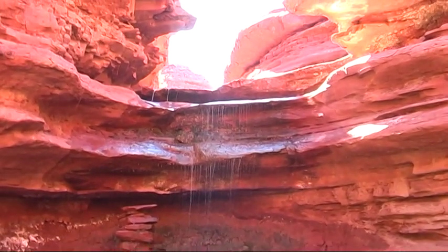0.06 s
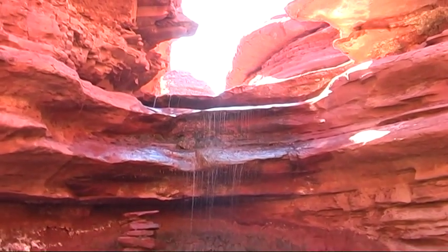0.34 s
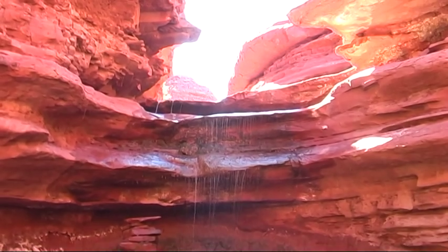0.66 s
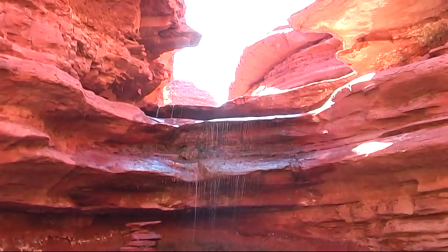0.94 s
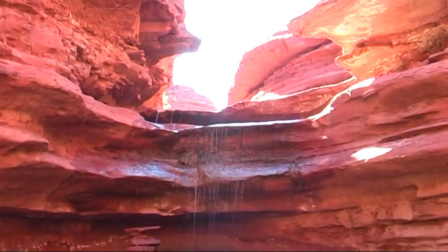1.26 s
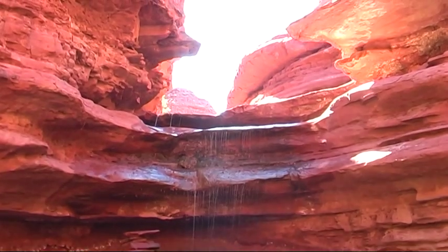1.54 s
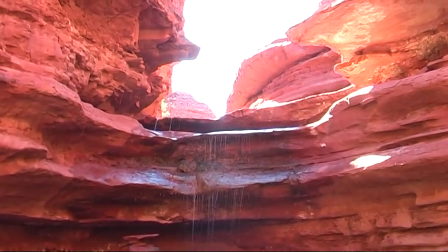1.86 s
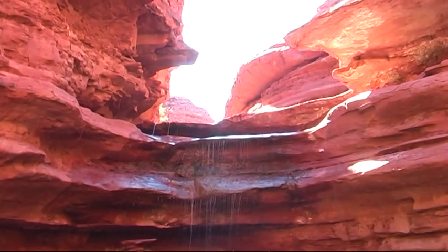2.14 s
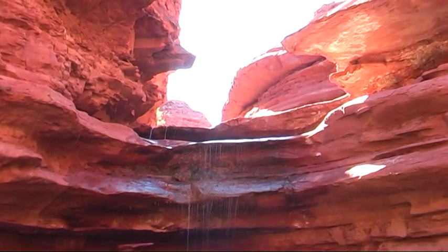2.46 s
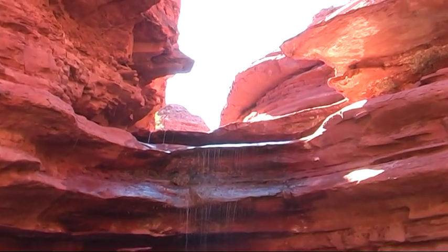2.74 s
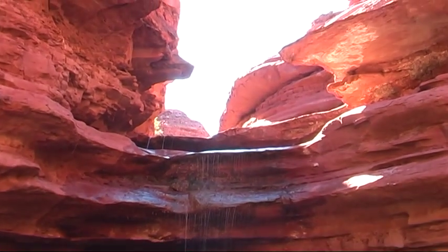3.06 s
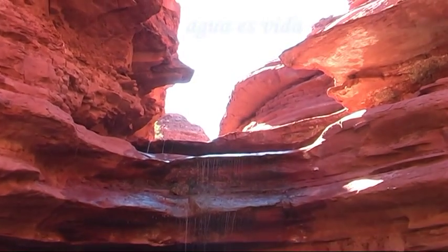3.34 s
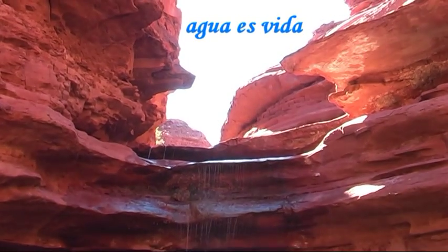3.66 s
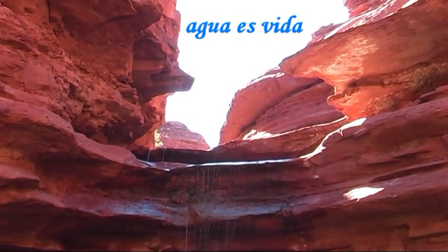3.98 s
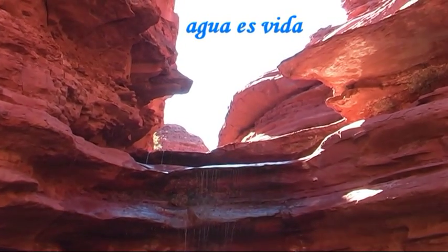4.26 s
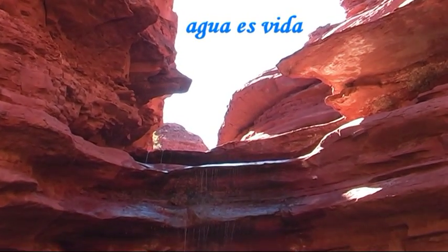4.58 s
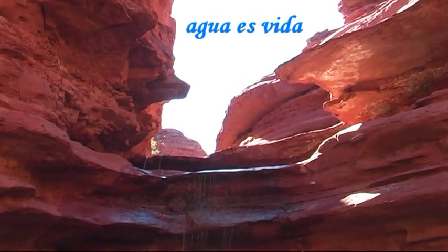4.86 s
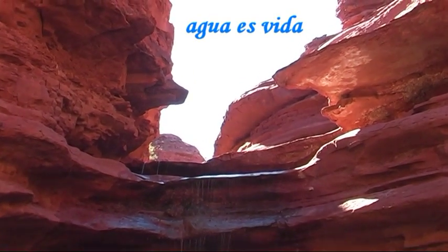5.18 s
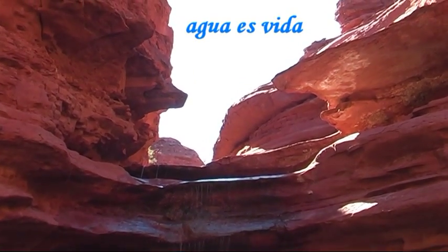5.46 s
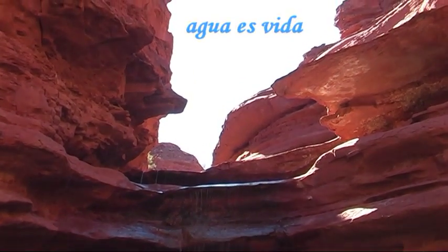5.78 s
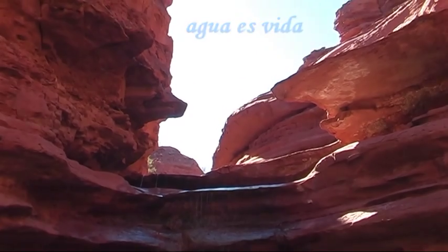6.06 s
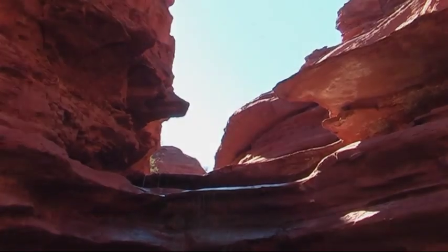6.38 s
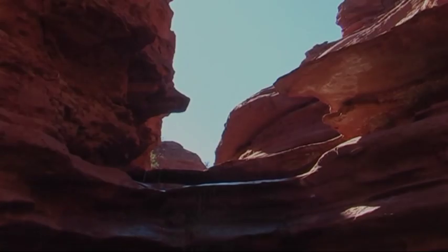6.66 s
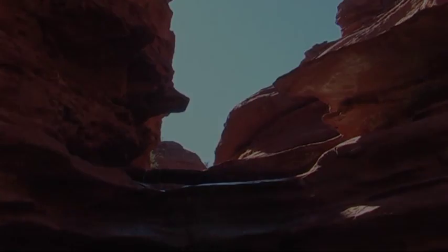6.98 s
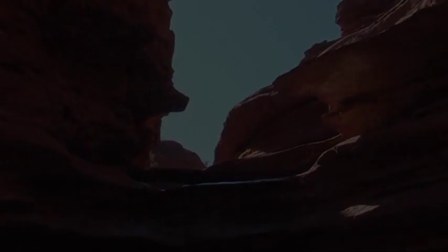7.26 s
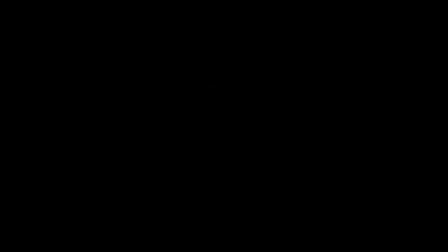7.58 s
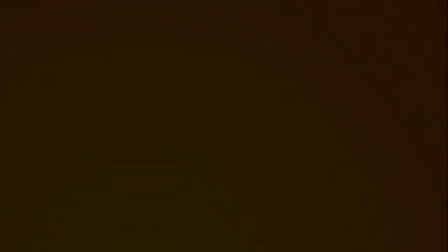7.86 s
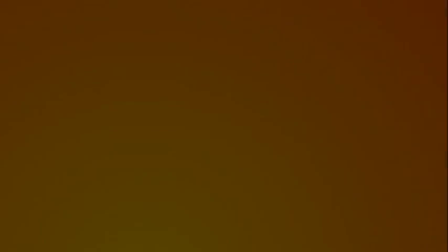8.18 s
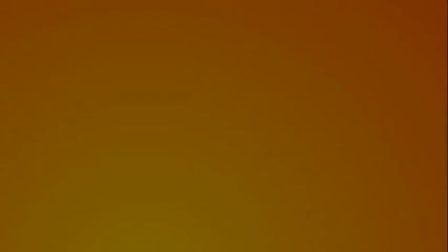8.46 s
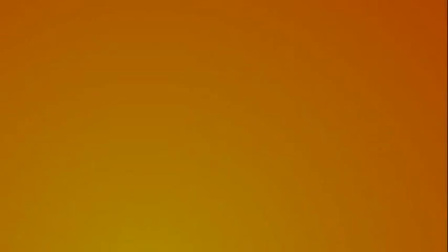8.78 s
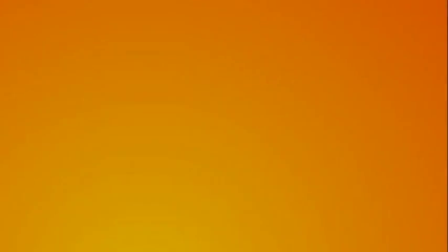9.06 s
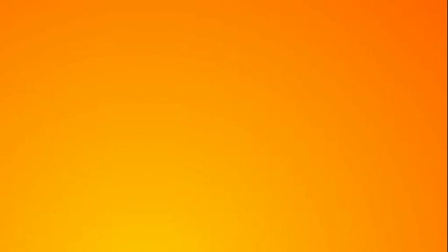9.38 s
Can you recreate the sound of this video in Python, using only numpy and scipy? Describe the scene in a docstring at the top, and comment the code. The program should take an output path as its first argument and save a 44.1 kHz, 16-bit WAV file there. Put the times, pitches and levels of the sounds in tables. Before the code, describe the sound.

Thin streams of water trickle from a rock overhang into a shallow pool, with a splashing hiss, drips and a few close knocking drops.

```python
"""A splashing hiss fades in: thin streams of water fall from a rock overhang into a shallow pool.
Drops plop in the pool and spatter on wet rock, trapped air bubbles plink, and fine spray ticks close by.
A few big drops knock on something hard near the microphone and make it ring. Air rushes softly below.
The sound is cut off after about 7.5 seconds and starts over from its beginning."""
import sys
import numpy as np
from scipy import signal
from scipy.fft import rfft, irfft, next_fast_len
from scipy.io import wavfile
from scipy.ndimage import uniform_filter1d

SR = 44100
rng = np.random.default_rng(int(sys.argv[2]) if len(sys.argv) > 2 else 0)


def generate_wav(sig):
    """Save sig (samples, or channels by samples) to the path in sys.argv[1] as 16-bit PCM at SR."""
    pcm = np.round(np.clip(np.atleast_2d(sig).T, -1, 1) * 32767).astype(np.int16)
    wavfile.write(sys.argv[1], SR, pcm)


N = 415422
CUT_S, RESTART_S = 7.546, 7.6

# the larger drops that hit the pool and the wet rock: t/s, level/dB, f/Hz, rough fading time/s
LARGE_DROPS = [(.684, -38.5, 4870, 0.0053), (2.133, -33.5, 7360, .035), (2.38, -34, 3100, 0.015),
               (2.67, -22, 5650, 0.023), (2.787, -35.5, 7350, 0.0067), (3.028, -36.5, 525, .014),
               (3.429, -35, 1190, 0.04), (3.731, -32.5, 5800, 0.026), (3.794, -32, 5000, .03),
               (3.866, -31, 6750, 0.022), (4.13, -37.5, 7300, 0.019), (4.322, -33, 3300, 0.024),
               (4.622, -26, 5200, .029), (4.791, -29.5, 6400, 0.022), (5.556, -36, 4700, .008),
               (5.61, -35.5, 5100, 0.017), (5.705, -35, 1420, 0.012), (6.078, -41, 5200, .008),
               (6.162, -34, 5140, .019), (6.722, -30.5, 6460, .019), (6.854, -33, 6900, .018),
               (6.929, -32, 4660, 0.023), (6.948, -36, 3350, 0.0069), (7.017, -36, 1550, 0.022),
               (7.304, -32, 6500, .025), (7.395, -36.5, 5160, 0.0065)]
def splashes():
    """Each of the larger drops makes a splash of its own."""
    out = np.zeros((2, N))
    for s, db, hz, decay_s in LARGE_DROPS:
        add(out, s, gain_of(db) * splash(hz, 0.93 * decay_s))
    return out


# hollows in the wet rock, each with a note of its own: f/Hz, width/Hz, level/dB
ROCK_HOLLOWS = [(4570, 220, 1), (6340, 440, -9)]
def splash(hz, decay_s, middle_hz=3100):
    """A drop bursts and rings the hollows. Low ones plop in the pool, high ones hit rock on the left."""
    width_hz = 800 * (hz / middle_hz) ** 0.68
    pan_db = 2.5 * max(np.log2(hz / middle_hz), 0)
    side_db = min(read(STEREO_WIDTH, hz) + 2, 0)
    crown = burst(hz, width_hz, decay_s, side_db, pan_db)
    spatter = gain_of(-4.5) * burst(hz, .65 * hz, decay_s, side_db, pan_db)
    t = np.arange(crown.shape[1]) / SR
    opening = 1 - np.exp(-t / (0.085 * decay_s))  # the crown of water takes a moment to open
    hit = (crown + spatter) * opening
    ringing = sum(gain_of(db) * band(hit, f, width, order=1) for f, width, db in ROCK_HOLLOWS)
    return unit_hit(hit + ringing)


def drips(level_db=-41.5, low_hz=750, high_hz=7500, count=56):
    """Medium drops fall at uneven times, more of them on the rock than in the pool."""
    out = np.zeros((2, N))
    for slot, (when, pitch, loud, length) in enumerate(rng.random((count, 4))):
        hz = low_hz * (high_hz / low_hz) ** (pitch ** 0.43)  # mostly high notes
        db = level_db + 2 * drop_size(loud, limit=2)
        add(out, (slot + when) * CUT_S / count, gain_of(db) * splash(hz, decay_s=.012 * (.5 + length)))
    return out


# how strong the small splashes are at each pitch: f/Hz, relative level/dB
PATTER_TONE = [(500, -3.5), (1000, -10.5), (1600, -1.5), (2500, -1), (4500, -11.5), (6500, 3.5), (9000, 5)]
def patter(level_db=-53):
    """Countless small splashes, low and high, land all over the pool."""
    out = np.zeros((2, N))
    for hz in np.geomspace(800, 8500, num=40):
        decay_s = 0.017 * rng.uniform(0.56, 1.6)
        drop = burst(hz, 0.13 * hz, decay_s, read(STEREO_WIDTH, hz), pan_db=rng.normal(.7, 2))
        out += shower(gain_of(read(PATTER_TONE, hz)) * drop, per_s=4.5, spread_db=3)
    return gain_of(level_db) * unit_rms(out)


# the clearest bubbles: t/s, level/dB, f/Hz
CLEAR_BUBBLES = [(.642, -42.5, 4900), (1.061, -38.5, 2600), (1.086, -43, 3900), (1.475, -43.5, 2850),
                 (1.525, -45, 4900), (3.184, -41.5, 2250), (3.731, -37, 5580), (4.9, -40.5, 2410),
                 (6.078, -35.5, 4670), (6.787, -44, 1800), (6.989, -39, 1696)]
def bubbles(small_db=-54, count=130):
    """A few clear plinks stand out among many faint bubbles."""
    out = np.zeros((2, N))
    for s, db, hz in CLEAR_BUBBLES:
        add(out, s, gain_of(db) * bubble(hz))
    for when, pitch, loud, place in rng.random((count, 4)):
        db = small_db + 3 * drop_size(loud)
        add(out, when * CUT_S, gain_of(db) * bubble(hz=1700 * 4.3 ** pitch, pan_db=10 * (place - .5)))
    return out


def bubble(hz, pan_db=0, cycles=26, rise=0.012):
    """Air trapped in the water rings briefly, and its note rises a little."""
    t = np.arange(SR // 12) / SR
    age = t * hz / cycles
    tone = np.sin(2 * np.pi * cycles * age * (1 + rise * (age - 1) / 2))
    loudness = np.exp(-age) * (1 - np.exp(-10 * age))
    return stereo(unit_hit(tone * loudness), 0, pan_db)


# big drops on the hard surface: t/s, level/dB, brightness/(dB per octave), top f/Hz that the blow wakes
KNOCKING_DROPS = [(.496, -22, -1.5, 4160), (.79, -29.5, 1.5, 7200), (1.03, -31.5, 9, 7000),
                  (1.354, -42, -6, 2200), (2.245, -32, 4, 5600), (2.597, -39, 5, 6000),
                  (2.739, -38, 0, 5500), (2.761, -32.5, -3, 3000), (2.866, -37.5, 0, 4800),
                  (3.856, -29, 5.5, 3260), (4.158, -32.5, 8, 6000), (4.215, -36.5, 19, 5600),
                  (5.053, -19, 7.5, 4180)]
# the notes that the surface rings with: f/Hz, relative level/dB, time to fade by 60 dB/s
SURFACE_NOTES = [(1395, -15, 0.045), (1580, 4, 0.013), (2110, -27, 0.0083), (2657, -6.5, .026),
                 (2855, -8.5, 0.039), (3210, -6, 0.041), (3397, 2.5, 0.026), (3640, -14.5, .028),
                 (3903, 0, 0.035), (4200, -18, 0.023), (4280, 3, 0.022), (4870, -3.5, 0.024),
                 (5210, -4.5, 0.029), (5790, -17.5, 0.017), (6260, -11.5, 0.058), (7200, -17.5, 0.022)]
def knocks(flatten_s=.0016, echo_s=.019, echo_db=-17):
    """A big drop rings the surface and bursts. Sharper blows wake higher notes; nearby rock echoes."""
    out = np.zeros((2, N))
    t = np.arange(SR // 8) / SR
    hz, note_db, t60 = np.transpose(SURFACE_NOTES)[:, :, None]
    fading = gain_of(note_db - 60 * t / t60)
    push = 1 - np.exp(-(t / flatten_s) ** 2)  # the blow builds up while the drop flattens
    for s, db, brightness, top_hz in KNOCKING_DROPS:
        blow = gain_of(brightness * np.log2(hz / hz.mean()))
        treble_cut = np.sqrt(1 + (hz / top_hz) ** 24)
        swing = np.sin(2 * np.pi * (hz * t + rng.random(hz.shape)))
        notes = blow / treble_cut * fading * swing
        ring = stereo(unit_hit(notes.sum(0) * push), 0)
        scatter = gain_of(-9) * burst(0.76 * top_hz, 0.25 * top_hz, decay_s=0.02, side_db=-22.5)
        plop = gain_of(-16) * burst(1440, 600, decay_s=0.0093, side_db=-18)
        add(out, s, gain_of(db) * (ring + scatter + plop))
        add(out, s + echo_s, gain_of(db + echo_db) * ring)
    return out


# the loudest droplets of spray: t/s, relative level/dB, f/Hz
SPRAY_DROPLETS = [(0.7173, -24, 14900), (0.9288, -25.5, 15000), (1.1503, -29.5, 11400),
                  (1.1837, -23, 15000), (1.2067, -25, 10800), (1.3109, -29.5, 12200),
                  (1.4775, -28.5, 11000), (1.5858, -22.5, 11100), (1.696, -27, 14900),
                  (1.7245, -25.5, 14600), (2.166, -28, 12400), (2.2218, -24.5, 13500),
                  (3.8018, -29.5, 11400), (3.9629, -30, 14400), (4.2732, -26, 15000),
                  (4.4024, -20.5, 15300), (5.8561, -28, 9500), (6.111, -26, 15000), (6.6677, -26.5, 10900),
                  (7.229, -27, 14900)]
# how strong the spray is at each pitch: f/Hz, relative level/dB
SPRAY_TONE = [(3000, -14.5), (8000, 1), (10000, -2), (11300, 0.5), (12000, -3.5), (13500, -2), (15000, -3),
              (15800, -1.5)]
# high notes that the spray sets ringing: f/Hz, width/Hz, relative level/dB
SPRAY_NOTES = [(11000, 160, -5.5), (11500, 160, -10.5), (13610, 150, -2), (14930, 260, 4)]
def spray(width_hz=4000, side_db=-15):
    """Droplets tick close by, above a mist of finer ones."""
    droplets = np.zeros((2, N))
    for s, db, hz in SPRAY_DROPLETS:
        add(droplets, s, gain_of(db - 11) * burst(hz, width_hz, 0.0094, side_db))
    mist = sum(shower(burst(hz, width_hz, 0.0038, side_db), per_s=3, spread_db=5)
               for hz in np.linspace(10500, 15500, num=16))
    ticks = coloured(droplets + gain_of(-53) * unit_rms(mist), SPRAY_TONE)
    return ticks + sum(gain_of(db) * band(ticks, hz, width, order=1) for hz, width, db in SPRAY_NOTES)


def alcove(sound, ground_s=.00302, t60=0.14, walls_db=-15):
    """The ground sends back one quick echo, and the rock walls add a short, faint blur of echoes."""
    t = np.arange(SR // 3) / SR
    tail = rng.standard_normal((2, len(t))) * gain_of(-60 * t / t60) * (t > .008)
    walls = signal.oaconvolve(sound, tail / np.linalg.norm(tail[0]), axes=1)[:, :N]
    ground = 0.14 * np.roll(sound, round(ground_s * SR), axis=1)
    return sound + ground + gain_of(walls_db) * walls


# the hiss of the falling water: f/Hz, level/(dB per Hz)
HISS_TONE = [(20, -110), (300, -90), (800, -85.5), (1150, -80), (1700, -77.5), (2300, -79), (3000, -81),
             (3800, -83), (5100, -82.5), (6500, -85), (8000, -88.5), (9500, -89), (13000, -87),
             (15800, -94)]
# narrow bands that stand out of the hiss: f/Hz, width/Hz, level/dB
HISS_PEAKS = [(12150, 450, -59.5), (14950, 160, -68), (1786, 6, -62.5)]
def hiss():
    """Faraway splashes blend into a hiss."""
    return wash(HISS_TONE, patchy_db=1.44, flicker_db=0.84) + steady_bands(HISS_PEAKS, side_db=-22)


# the low rush of air in the canyon: f/Hz, relative level/(dB per Hz)
AIR_TONE = [(15, -83), (38, -81), (55, -72), (80, -77.5), (130, -75), (330, -76.5), (470, -79.5),
            (750, -79.5), (1100, -86), (2000, -100), (8000, -130)]
# a barely audible 25 Hz band of steady noise, under two low hums: f/Hz, width/Hz, relative level/dB
LOW_BANDS = [(25, 3.8, -57), (61, 9, -67.5), (102.5, 5.8, -59.5)]
def air_and_hum(entry_s=0.99, peak_s=5.6, swell_s=2.2):
    """A low rush of air and a faint hum come in later than the water and slowly swell once."""
    t = np.arange(N) / SR
    entry_db = -11 * np.maximum(1 - (t / entry_s) ** 2, 0)
    swell_db = 3 * np.exp(-((t - peak_s) / swell_s) ** 2)
    rush = wash(AIR_TONE, patchy_db=1.2, flicker_db=0.77)
    low_bands = steady_bands(LOW_BANDS, side_db=1.5)
    return gain_of(entry_db + swell_db - 2) * (rush + low_bands)


# how wide the noise and the splashes sound at each pitch: f/Hz, level of side against middle/dB
STEREO_WIDTH = [(100, -1), (500, -0.5), (900, -1.5), (1700, -6), (2700, -6.5), (3800, -2.5), (5100, -3.5),
                (6500, -2), (8000, -6.5), (10000, -9), (12500, -13.5), (15500, -6.5)]
def wash(tone, patchy_db, flicker_db, echo_s=.0043):
    """Steady noise flickers in patches of time and pitch; a quick echo ripples its sides."""
    frames, bins = N // 128 + 5, 257
    real, imag = rng.standard_normal((2, 2, frames, bins))
    patches = uniform_filter1d(rng.standard_normal((frames, bins)), size=8, axis=0)
    patches = unit_rms(uniform_filter1d(patches, size=9, axis=1))
    flicker = unit_rms(uniform_filter1d(rng.standard_normal(frames), size=10))[:, None]
    spectra = (real + 1j * imag) * gain_of(patchy_db * patches + flicker_db * flicker)
    _, noise = signal.istft(spectra.transpose(0, 2, 1), nperseg=512, noverlap=384)
    white = unit_rms(noise[:, :N]) * np.sqrt(SR / 2)  # 0 dB per Hz
    mid, side = coloured(white, tone)
    echo = .2 * np.roll(side, round(echo_s * SR))
    return stereo(mid, coloured(side + echo, STEREO_WIDTH))


def steady_bands(rows, side_db):
    """Narrow bands of steady noise, each close to a note."""
    mid, side = sum(gain_of(db) * unit_rms(band(rng.standard_normal((2, N)), hz, width))
                    for hz, width, db in rows)
    return stereo(mid, gain_of(side_db) * side)


def burst(hz, rough_width_hz, decay_s, side_db, pan_db=0):
    """A drop breaks up into tiny clicks around one pitch, which quickly die away."""
    t = np.arange(SR // 8) / SR
    clicks = rng.standard_normal((2, len(t))) * np.exp(0.32 * rng.standard_normal(len(t)))
    mid, side = map(unit_rms, band(clicks * np.exp(-t / decay_s), hz, 1.18 * rough_width_hz))
    return unit_hit(stereo(mid, side * gain_of(side_db), pan_db))


def shower(sound, per_s, spread_db):
    """Repeats the sound of a drop at random times and strengths."""
    out = np.zeros((2, N))
    for when, loud in rng.random((int(per_s * CUT_S) + 1, 2)):
        add(out, when * CUT_S, sound * gain_of(spread_db * drop_size(loud)))
    return out


def drop_size(chance, limit=3):
    """Turns a random number from 0 to 1 into a size: most drops are small, a few are large."""
    return min(-np.log(1 - chance), limit)


def gain_of(db):
    """Turns decibels into a number to multiply a sound by."""
    return 10 ** (np.asarray(db) / 20)


def unit_rms(x):
    """Sets the average strength (rms) of a sound to 1."""
    return x / np.sqrt(np.mean(x ** 2) + 1e-20)


def unit_hit(x):
    """Gives a short sound the energy of 10 ms at strength 1."""
    return unit_rms(x) * np.sqrt(.01 * SR / x.shape[-1])


def read(points, hz):
    """Looks up the level at a pitch, gliding between the rows of a table."""
    f, db = np.transpose(points)
    return np.interp(np.log(hz + 1), np.log(f + 1), db)


def add(mix, s, sound):
    """Lays a stereo sound into the mix, s seconds in."""
    part = mix[:, round(s * SR):][:, :sound.shape[1]]
    part += sound[:, :part.shape[1]]


def band(x, hz, width, order=2):
    """Keeps only the pitches around hz."""
    edges = np.clip([hz - width / 2, hz + width / 2], hz / 4, .48 * SR)
    return signal.sosfilt(signal.butter(order, edges, "bandpass", fs=SR, output="sos"), x)


def coloured(x, points):
    """Turns each pitch up or down as a table says."""
    size = next_fast_len(x.shape[-1] + 512)
    gains = gain_of(read(points, np.fft.rfftfreq(size, 1 / SR)))
    return irfft(rfft(x, size) * gains, size)[..., :x.shape[-1]]


def stereo(mid, side, pan_db=0):
    """Makes left and right from what they share (mid) and what sets them apart (side)."""
    return np.array([(mid + side) * gain_of(pan_db / 2), (mid - side) * gain_of(-pan_db / 2)])


def scene():
    """The pool echoing under the overhang, the drops close by, and the background."""
    pool = splashes() + drips() + patter() + bubbles()
    return alcove(pool) + knocks() + spray() + hiss() + air_and_hum()


def record(dry, fade_start_s=0.25, fade_s=1.106, noise_db=-95, top_hz=15850):
    """Fades in, cuts off and starts over, above faint electronic noise; the top treble is removed."""
    t = np.arange(N) / SR
    fade_in = np.clip((t - fade_start_s) / fade_s, 0, 1) ** 1.22
    cut_off = np.clip((CUT_S - t) / .004, 0, 1)
    once = dry * fade_in * cut_off
    out = once + gain_of(noise_db) * rng.standard_normal((2, N))
    add(out, RESTART_S, once)
    lowpass = signal.firwin(511, top_hz, window=("kaiser", 9), fs=SR)
    return signal.oaconvolve(out, lowpass[None], "same")


dry = scene()
out = record(dry)
generate_wav(out)
```